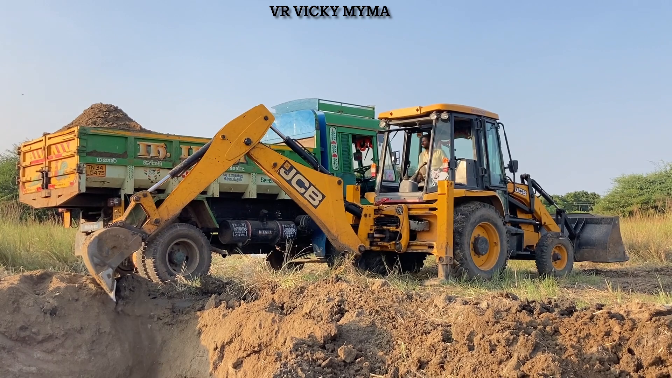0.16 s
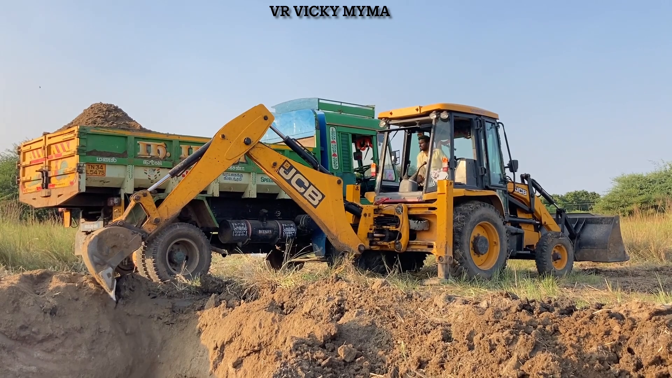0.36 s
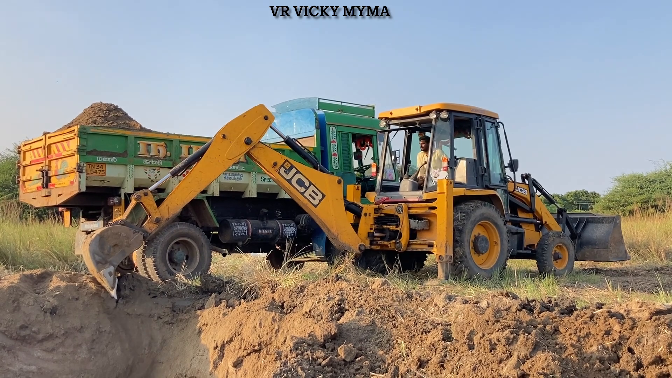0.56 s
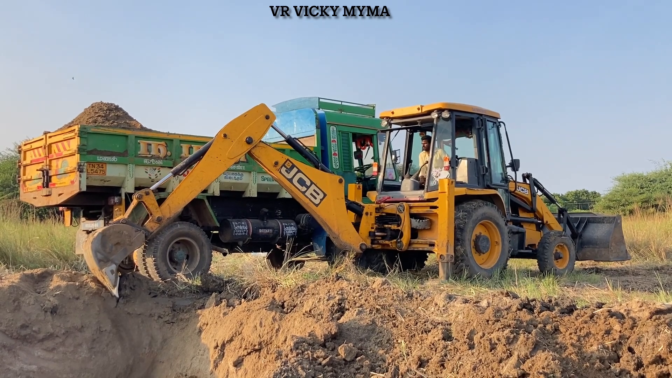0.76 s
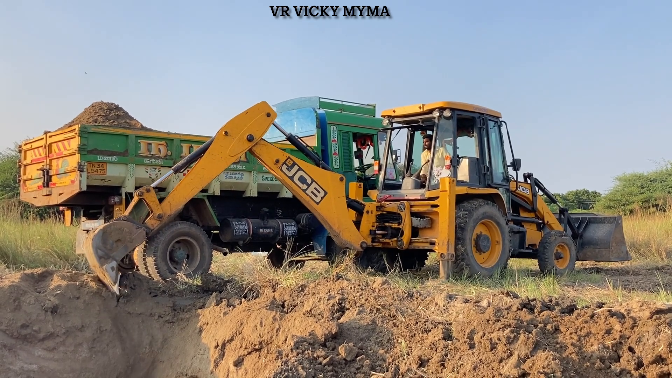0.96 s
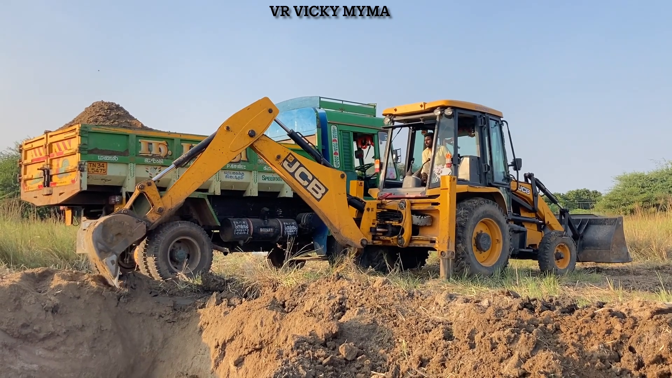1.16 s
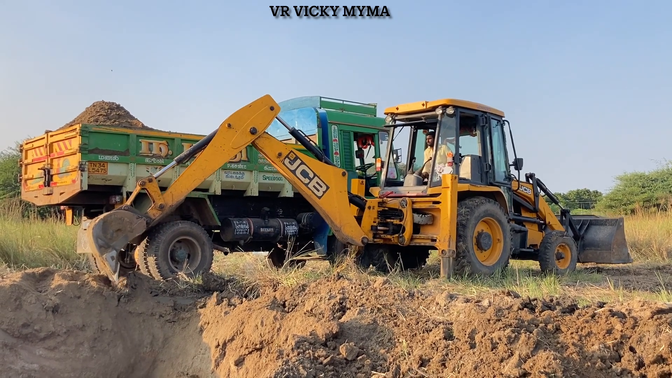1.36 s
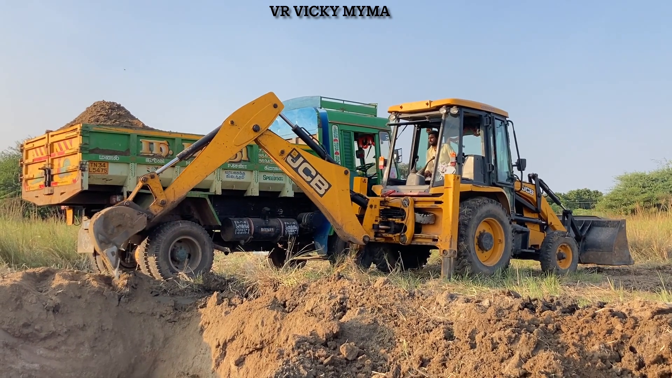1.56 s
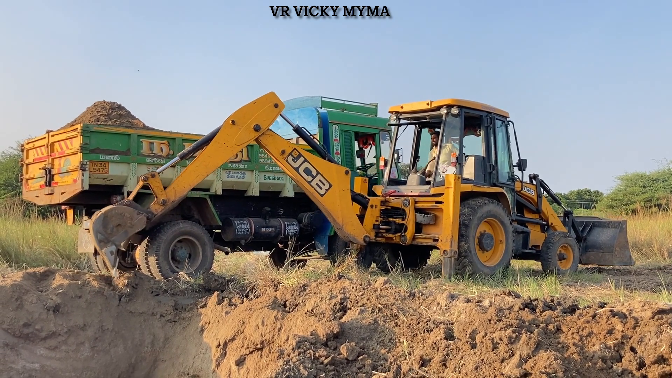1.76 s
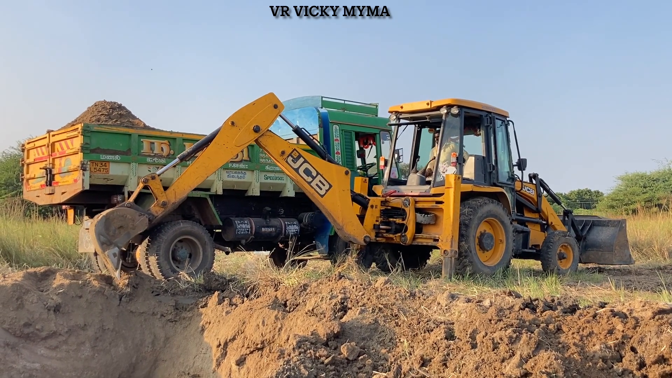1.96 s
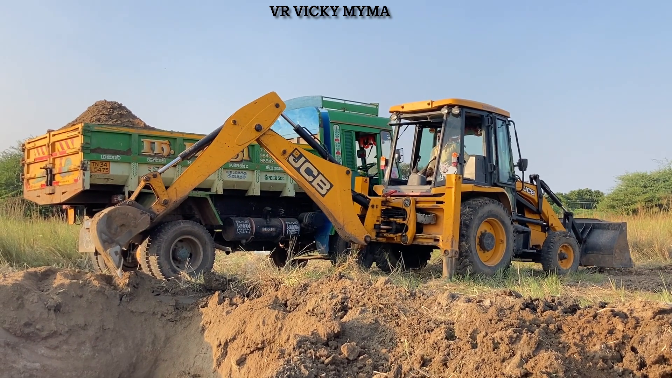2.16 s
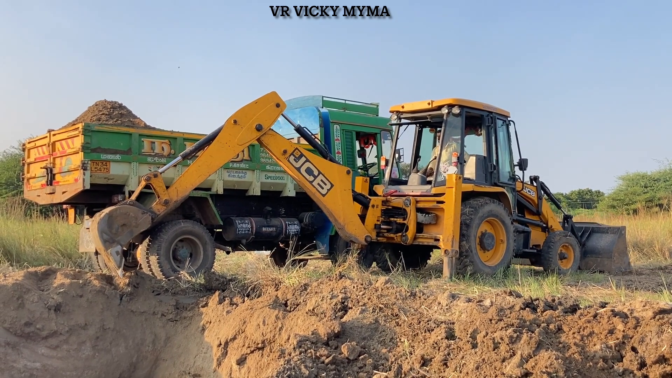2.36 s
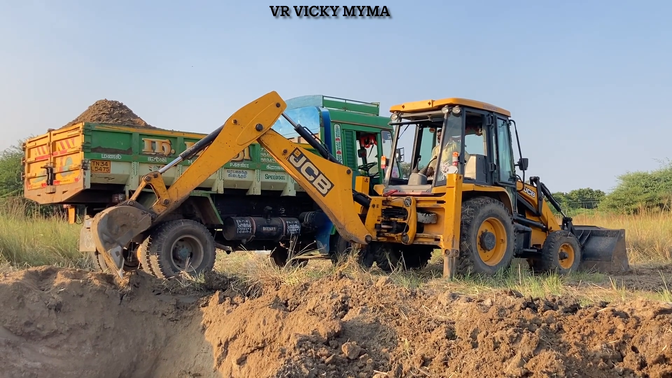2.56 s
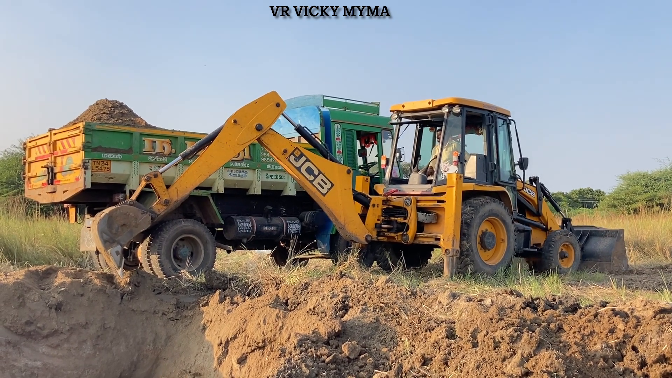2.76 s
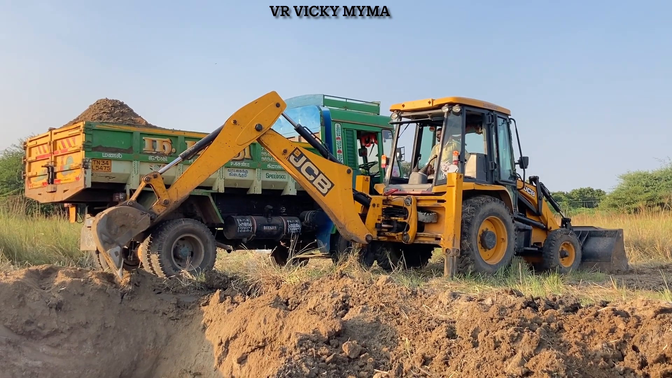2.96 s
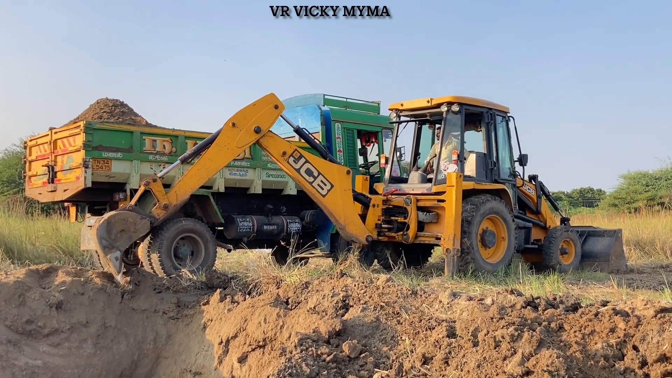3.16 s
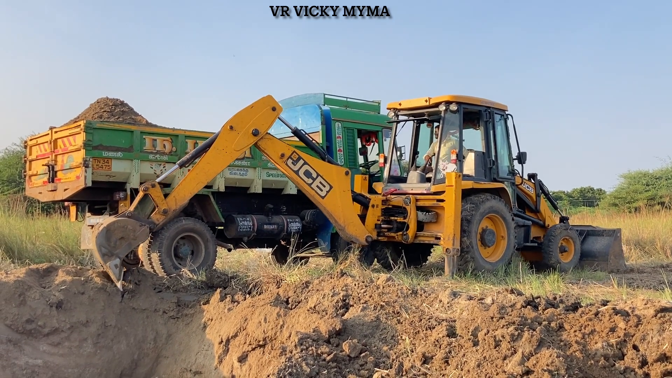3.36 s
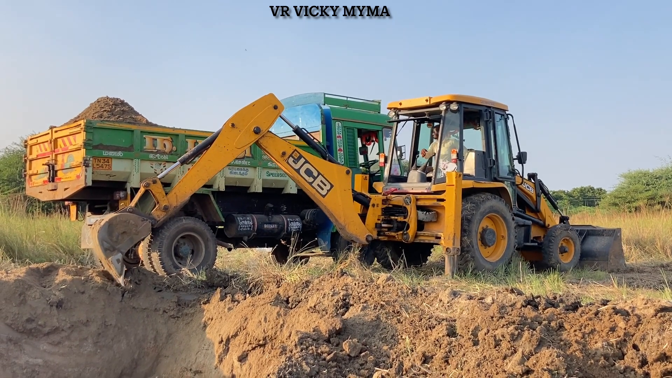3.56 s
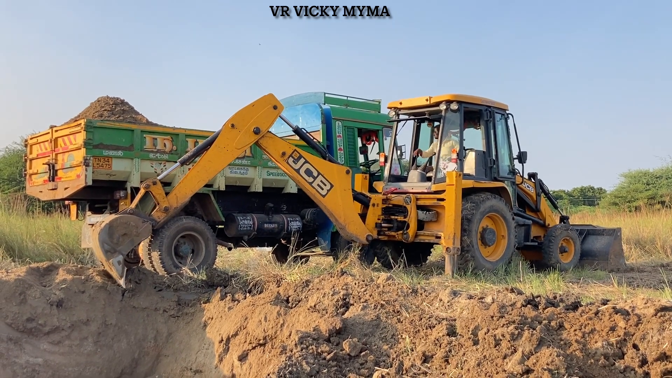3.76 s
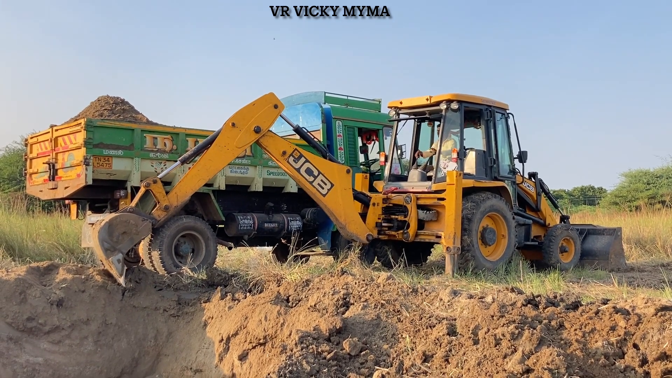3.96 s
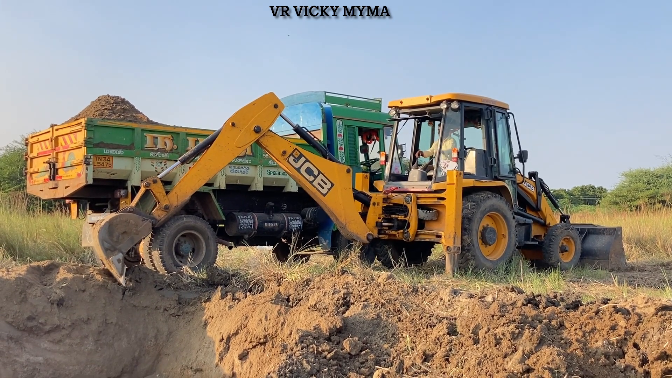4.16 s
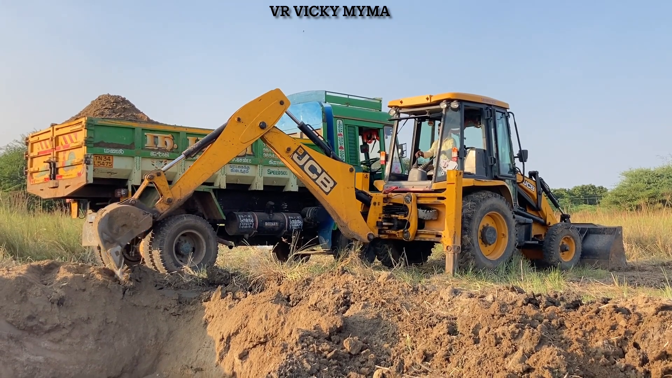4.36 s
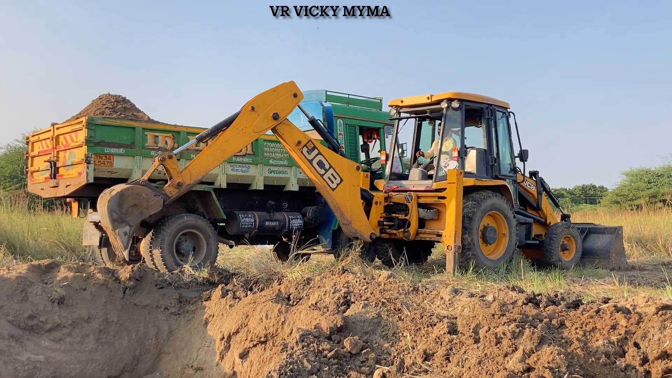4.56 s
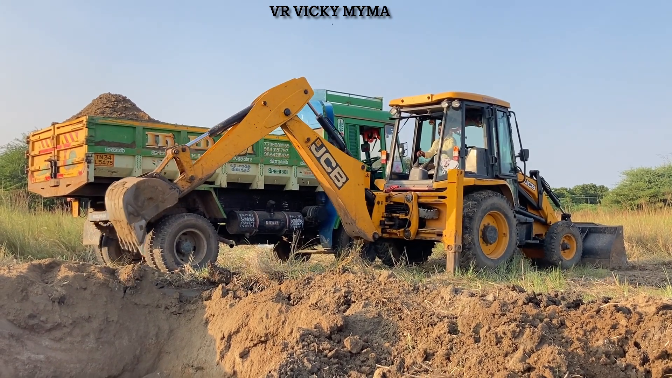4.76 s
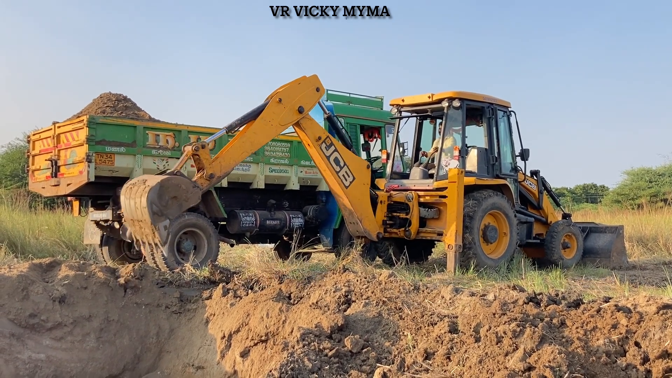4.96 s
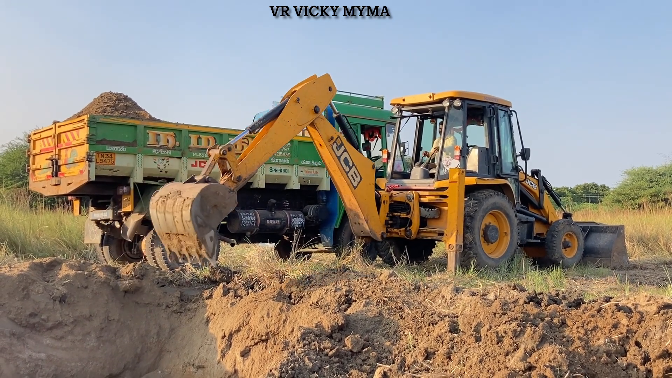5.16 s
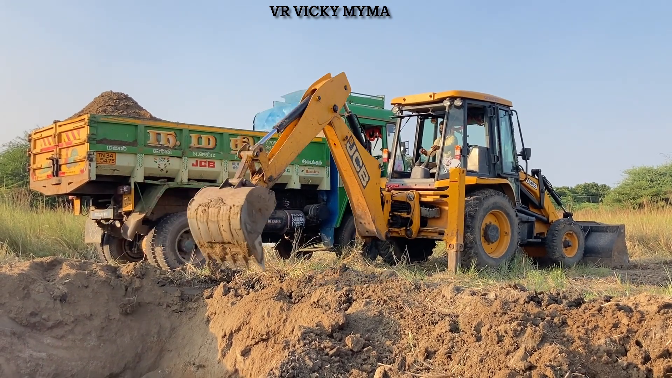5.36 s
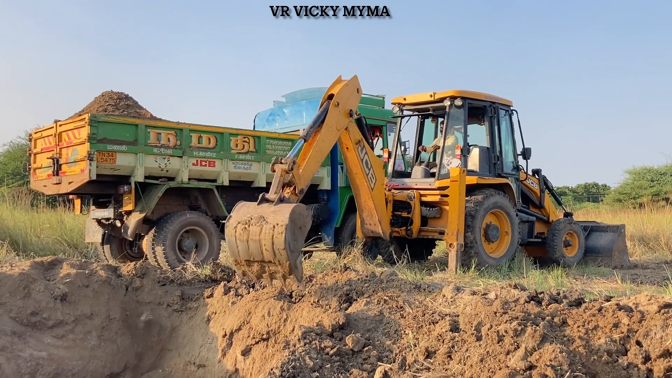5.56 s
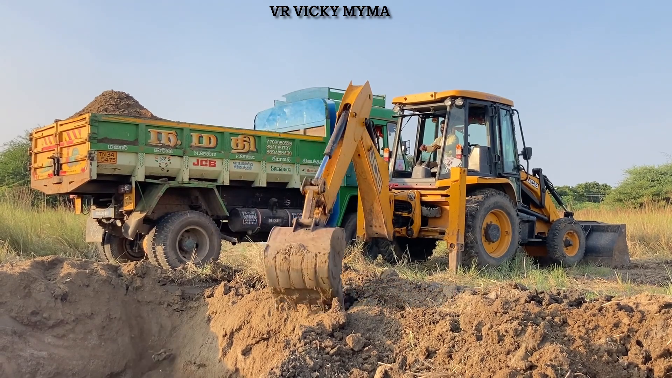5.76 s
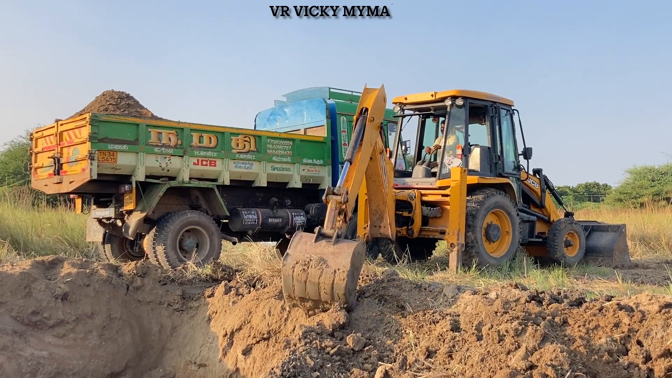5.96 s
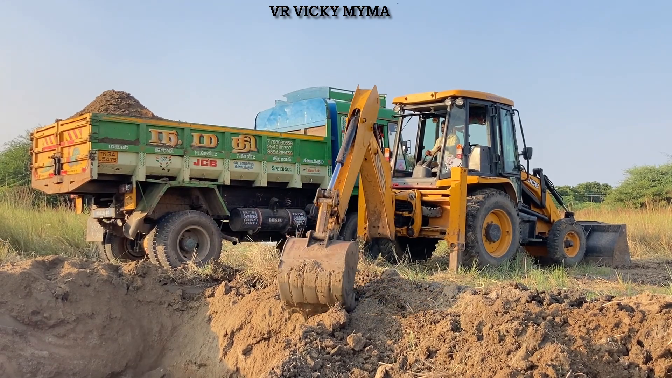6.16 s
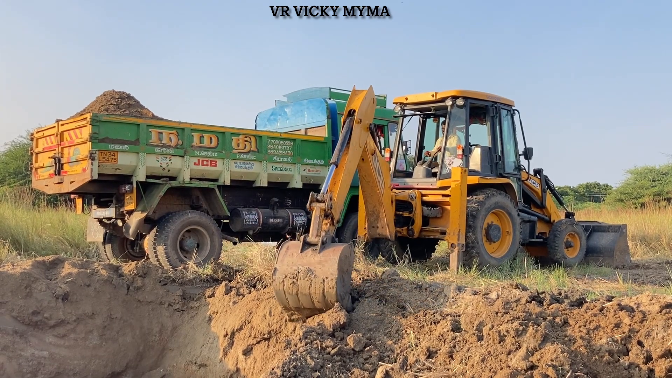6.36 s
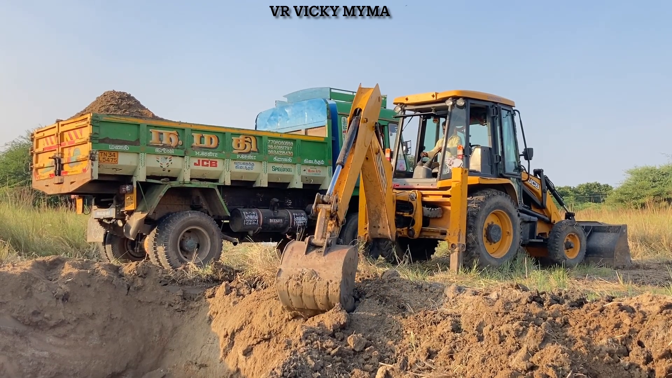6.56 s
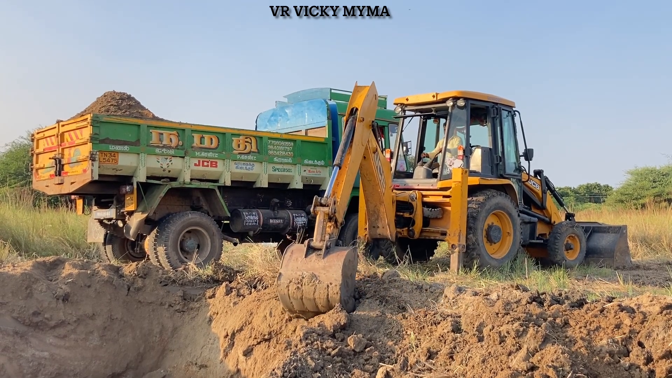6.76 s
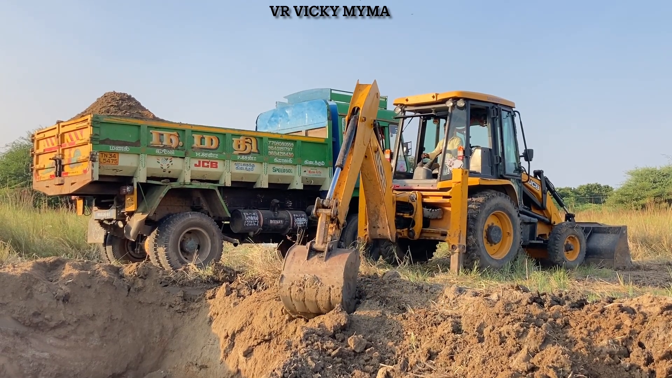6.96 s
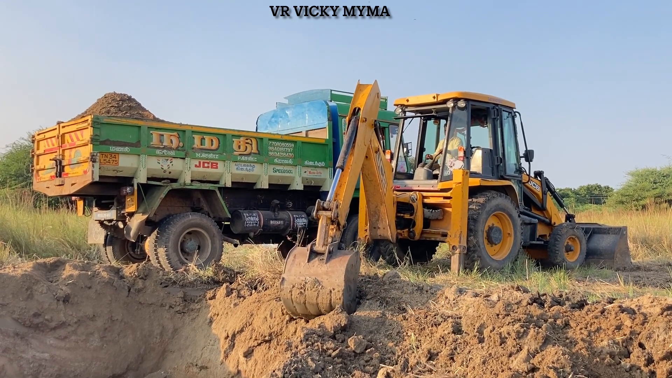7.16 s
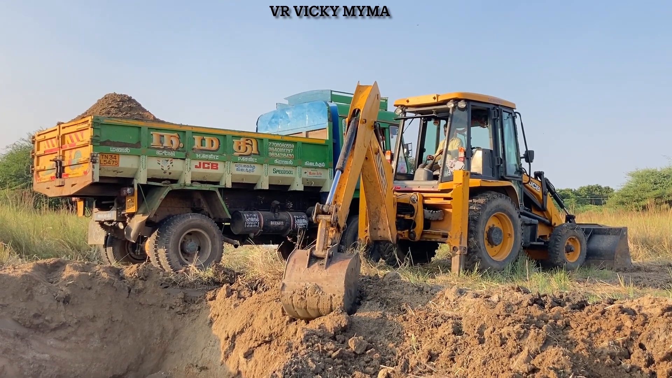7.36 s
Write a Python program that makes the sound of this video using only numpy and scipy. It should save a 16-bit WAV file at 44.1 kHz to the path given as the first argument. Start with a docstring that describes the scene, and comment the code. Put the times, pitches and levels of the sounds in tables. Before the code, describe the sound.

A backhoe loader's diesel engine hums and sags under load while its steel arm knocks, then clanks hard and judders as the swing stops.

```python
"""Backhoe loader lifting and swinging its bucket

A backhoe loader lifts its bucket out of the soil and swings it round, some ten metres off in an open field.
Ram strokes load the four-cylinder diesel: firing tones and pulses through a resonant pipe sag and bark.
Filtered noise makes the block's clatter, the low rumble, the pump's sizzle and the oil hissing through valves.
Slack pins knock in the steel arm, bursts of contacts ringing its modes; it clanks hard as the swing stops
and then judders. Taps, clinks and squeaks come from the bucket, its link and the pins."""
import sys
import numpy as np
from scipy import signal
from scipy.fft import rfft, irfft
from scipy.io import wavfile
from scipy.ndimage import uniform_filter1d

SR = 44100
rng = np.random.default_rng(int(sys.argv[2]) if len(sys.argv) > 2 else 0)


def dump_mix(stems):
    """Bounce the given channels to the path in sys.argv[1] as a 16-bit WAV at rate SR."""
    frames = np.atleast_2d(stems).T  # one column per channel
    limited = np.clip(frames, -1, 1)  # hard clip at full scale
    pcm = np.round(limited * 32767).astype(np.int16)
    wavfile.write(sys.argv[1], SR, pcm)


N = 326781
TIME = np.arange(N) / SR
# The pump's sizzle dies away and cuts back in: start in s, end in s, time to fade in s, time to return in s.
PUMP_REST = (1.84, 2.64, 0.54, 0.034)


def undb(db):
    """Decibels to gain."""
    return 10 ** (np.asarray(db) / 20)


def unit(x):
    """Scale to rms 1."""
    return x / np.sqrt(np.mean(x ** 2))


def noise():
    """White noise."""
    return rng.standard_normal(N)


def walk(rate):
    """Smooth chance with spread 1 and about rate turns a second."""
    k = max(int(SR / rate), 2)
    once = uniform_filter1d(noise(), k, mode="wrap")
    return unit(uniform_filter1d(once, k, mode="wrap"))


def colour(x, points, size=8192):
    """Causal, minimum-phase filter with the given (Hz, dB) response."""
    hz, db = np.transpose(points)
    grid = np.maximum(np.fft.rfftfreq(size, 1 / SR), 1)
    response_db = np.interp(np.log(grid), np.log(hz), db)
    cepstrum = irfft(np.log(undb(response_db)))
    # folding the cepstrum forward makes the filter causal
    cepstrum[1:size // 2] *= 2
    cepstrum[size // 2 + 1:] = 0
    impulse = irfft(np.exp(rfft(cepstrum)))
    return signal.fftconvolve(x, impulse)[:len(x)]


def band(x, hz, width):
    """One resonance, gain 1 at its centre."""
    return signal.lfilter(*signal.iirpeak(hz, hz / width, SR), x)


def resonate(x, table):
    """A body of (Hz, width in Hz, dB) resonances."""
    return sum(undb(db) * band(x, hz, width) for hz, width, db in table)


def add(track, s, sound):
    """Mix a sound in at time s."""
    i = int(s * SR)
    track[i:i + len(sound)] += sound[:N - i]


def gate(start, end, attack_s, release_s):
    """Rises from start, holds at 1 until end, then falls."""
    rise = np.clip((TIME - start) / attack_s, 0, 1)
    fall = np.clip(1 - (TIME - end) / release_s, 0, 1)
    return rise * fall


def bouts(table, steady_db, release_s):
    """Gain of a steady sound with louder bouts on top; their powers add."""
    power = sum((undb(db) * gate(start, end, attack_s, release_s)) ** 2
                for start, end, attack_s, db in table)
    return np.sqrt(undb(steady_db) ** 2 + power)


def hydraulic_load():
    """The hardest-working ram sets the load on the engine."""
    # Each row: start in seconds, end in seconds, time to build in seconds, share of full load.
    strokes = [(0.503, 1.62, 0.42, 0.59), (0.8, 1.672, 0.73, 0.9), (2.85, 3.529, 0.4, 0.98),
               (4.27, 4.599, 0.17, 0.85), (4.598, 5.109, .47, 0.9), (6.359, 7.084, 0.46, 0.96),
               (6.894, 7.41, 0.22, 0.87)]
    unload_s = 0.28
    rams = [share * gate(start, end, build_s, unload_s) for start, end, build_s, share in strokes]
    return np.max(rams, axis=0)


def firing_rate(load):
    """The engine droops under load, sags further as load comes on and overshoots as it lets go."""
    idle_hz, droop_hz, sag_hz, governor_s = 54.33, 3.5, 4.2, 0.22
    keep = np.exp(-1 / (governor_s * SR))
    fuel = signal.lfilter([1 - keep], [1, -keep], load)  # the fuel catches up with the load
    return idle_hz - droop_hz * load - sag_hz * (load - fuel)


def loaded(load, free_db, added_db):
    """Gain of an engine sound from its level running free and the dB added in step with the load."""
    return undb(free_db + added_db * load)


def firings(turns, cylinder_db, scatter_db, jitter_s):
    """One pulse per firing; the four cylinders differ and each firing varies in strength and timing."""
    at = np.flatnonzero(np.diff(np.floor(turns)))
    chance = rng.standard_normal((len(at), 2))
    late = (jitter_s * SR * chance[:, 1]).astype(int)
    strength_db = np.resize(cylinder_db, len(at)) + scatter_db * chance[:, 0]
    pulses = np.zeros(N)
    pulses[np.clip(at + late, 0, N - 1)] = undb(strength_db)
    return pulses


def smear(x):
    """Short reflections round the machine spread each pulse over the cycle and leave its colour alone."""
    # Each row: delay in seconds, share fed back.
    echoes = [(.0031, 0.48), (.0053, 0.55), (.0083, .4)]
    hz, spectrum = np.fft.rfftfreq(N, 1 / SR), rfft(x)
    for delay_s, share in echoes:
        late = np.exp(-2j * np.pi * hz * delay_s)
        spectrum = spectrum * (late - share) / (1 - share * late)  # all-pass echo
    return irfft(spectrum, N)


def exhaust(turns, load):
    """Firing tone, octave and lope of unequal cylinders; pulses with a little gas ring the pipe and bark."""
    # Exhaust pipe resonances. Each row: pitch in Hz, width in Hz, level in dB before the bark's colouring.
    pipe = [(174, 46, -12.5), (223, 24, -11.5), (285, 12, 1.5), (349.6, 34, 5), (536, 60, 0), (761, 13, 8),
            (887, 51, -2.5), (1008, 40, -3)]
    angle = 2 * np.pi * turns
    # the engine coasts after the first stroke and its boom fades by 12 dB
    coast = undb(-12 * gate(start=1.78, end=2.04, attack_s=0.2, release_s=0.26))
    tone = loaded(load, free_db=-34.5, added_db=10) * np.sin(angle - .6) * coast
    octave = loaded(load, free_db=-42, added_db=20) * np.sin(2 * angle - .8)
    lope = loaded(load, free_db=-54, added_db=15) * np.sin(3 * angle / 2)
    pulses = unit(firings(turns, cylinder_db=[.8, -.6, .3, -.9], scatter_db=1.1, jitter_s=.00005))
    gas = unit(np.exp(-(turns % 1) / 0.15) * noise())  # dies away after each firing
    flow = pulses + gas / 4
    bark_colour = [(90, -51.0), (150, 12.5), (1100, -4.5), (2500, -37.0), (8000, -30)]
    bark = unit(colour(resonate(smear(flow), pipe), bark_colour))
    tones = np.sqrt(2) * (tone + octave + lope)  # sine levels are rms
    return tones + bark * loaded(load, free_db=-47, added_db=16.5)


def growl(turns, load):
    """Under load single firing harmonics stand out of the exhaust, each swelling and wavering on its own."""
    orders, mix_db = (7, 11, 15), (0, -4, -11.5)  # multiples of the firing rate, and their relative dB
    tones = np.zeros(N)
    for order, db in zip(orders, mix_db):
        swell = undb(db + 3.5 * walk(24))
        tones += swell * np.sin(2 * np.pi * order * turns + .6 * walk(20))
    return unit(tones) * loaded(load, free_db=-54.5, added_db=20)


def groan(turns):
    """The hydraulic pump drones unsteadily at six times the firing rate against a stalled ram."""
    # Each row: start in seconds, end in seconds, time to build in seconds, level in dB.
    groan_bouts = [(4.85, 5.1, .1, -48), (6.58, 7.03, 0.22, -30), (7.25, 7.41, 0.11, -31)]
    tone = np.sin(6 * 2 * np.pi * turns + .5 * walk(25))
    return unit(tone * undb(2.1 * walk(30))) * bouts(groan_bouts, steady_db=-62, release_s=0.064)


def rumble():
    """A ragged low rumble that swells while the bucket works."""
    # Rumble spectrum. Each row: frequency in Hz, relative level in dB per Hz.
    low_spectrum = [(20, -50), (35, -17), (50, -10), (65, -2.5), (105, -7.5), (135, -11.5), (220, -16),
                    (400, -31), (900, -78)]
    # Each row: start in seconds, end in seconds, time to build in seconds, level in dB.
    swells = [(.62, .85, 0.086, -32.5), (1.6, 1.82, 0.094, -24.5), (2.3, 3.3, 0.086, -33),
              (5.5, 6.15, 0.27, -32.5)]
    return unit(colour(noise(), low_spectrum)) * bouts(swells, steady_db=-35.5, release_s=0.4)


def slap(blows, decay_s, top_hz, count):
    """Each cylinder thumps the block in its own way, the same shape on every cycle."""
    t, out = TIME[:SR // 16], np.zeros(N)
    shapes = rng.standard_normal((count, len(t))) * np.exp(-t / decay_s)
    for k, i in enumerate(np.flatnonzero(blows)):
        add(out, i / SR, blows[i] * shapes[k % count])
    return signal.sosfilt(signal.butter(2, top_hz, fs=SR, output="sos"), unit(out))


def block(turns, load):
    """Combustion knock, strongest once a shaft turn, with valve gear and fan shakes the block and covers."""
    # Block spectrum. Each row: frequency in Hz, relative level in dB per Hz.
    block_spectrum = [(100, -36.5), (150, -1.5), (215, 2.5), (285, -5), (345, 8.5), (410, -8), (495, -1.5),
                      (610, -17), (1000, -11), (1800, -16), (2900, -35), (3600, -31), (5000, -32),
                      (12000, -31.5), (16000, -31.5)]
    # Engine cover resonances. Each row: pitch in Hz, width in Hz, relative level in dB.
    panels = [(347.6, 40, 7), (730, 33, 7.5), (878.4, 19, -4)]
    blows = firings(turns, cylinder_db=[2.5, -8.5, 2.5, -2.5], scatter_db=3.0, jitter_s=.0002)
    knock = slap(blows, decay_s=0.015, top_hz=1790, count=4)
    gear = unit(noise() * undb(1.74 * walk(61)))
    drive = unit(knock + 1.5 * gear)
    covers = unit(resonate(np.roll(drive, SR // 500), panels))  # 2 ms after the block
    body = unit(colour(drive, block_spectrum)) + undb(-9.0) * covers
    return unit(body) * loaded(load, free_db=-32, added_db=1.5)


def rattle(load):
    """A loose cover chatters in irregular fits as the engine labours."""
    # Loose cover resonances. Each row: pitch in Hz, width in Hz, relative level in dB.
    cover = [(877, 49, -2), (979, 38, 3), (1028, 78, 5)]
    chatter = noise() * undb(3.5 * walk(45))
    return unit(band(resonate(chatter, cover), 984, 420)) * loaded(load, free_db=-57, added_db=16.5)


def valves():
    """A valve opens and oil rushes through, hissing with a slight flutter."""
    # Hiss spectrum. Each row: frequency in Hz, relative level in dB per Hz.
    hiss_spectrum = [(1000, -15), (2500, -1), (5000, 7), (7000, 10), (9000, 2), (11400, 10), (16000, -4)]
    # Each row: start in seconds, end in seconds, time to open in seconds, level in dB.
    openings = [(1.7, 2.05, 0.54, -48), (2.7, 3.5, 0.13, -50), (3.25, 3.31, 0.02, -42),
                (4.92, 5.02, 0.063, -45), (5.15, 5.88, 0.59, -46.5), (6.5, 7.02, 0.4, -36),
                (7.2, 7.41, 0.029, -45)]
    hiss = unit(colour(noise() * undb(2.2 * walk(36)), hiss_spectrum))
    return hiss * bouts(openings, steady_db=-56.5, release_s=0.17)


def pump():
    """A fine sizzle of oil in one broad resonance; it stops while the levers rest."""
    working = 1 - gate(*PUMP_REST)
    sizzle = unit(band(band(noise(), 3500, 2900), 3500, 2900))
    return sizzle * working * undb(-51.5 + 2.0 * walk(51))


def steel(force, ring_db, spread_db):
    """The arm's answer to a force: a dense clash plus its modes, whose mix depends on the place struck."""
    # Contact spectrum. Each row: frequency in Hz, relative level in dB.
    contact_spectrum = [(80, -16.5), (170, 8), (600, 3), (1400, 4), (2400, -2), (3000, -9.5), (3700, -7.5),
                        (4700, -20.5), (5400, -11.5), (7000, -18.5), (11000, -22.5), (16000, -38)]
    # Modes of arm and bucket. Each row: mean pitch in Hz, mean relative level in dB, 60 dB decay in seconds.
    modes = [(164, -4, 0.67), (182, -7, 0.4), (226.6, 2, 0.27), (345, -9, 0.26), (448, -3.5, 0.59),
             (523.5, -2, 0.41), (696, 0.5, 0.47), (788, 6, 0.13), (957, 0, 0.14), (1031, 5, 0.13),
             (1413, -4.5, 0.25), (1454, 4, 0.094), (1543, -9, 0.12), (1794, -2.5, 0.11), (1912, -1.5, 0.13),
             (2296, -3, 0.089), (2309, -6.5, 0.1), (2445, -9, 0.13), (2790, -10.5, 0.11), (3460, -9.5, .17),
             (3580, -11, .13), (4100, -15.5, 0.18)]
    t, ring = TIME[:SR // 4], 0
    place = rng.standard_normal((len(modes), 2))
    for (hz, db, t60), (level_chance, pitch_chance) in zip(modes, place):
        wave = np.sin(2 * np.pi * hz * (1 + 0.0038 * pitch_chance) * t)
        ring = ring + undb(db + spread_db * level_chance) * wave * np.exp(-np.log(1000) * t / t60)
    ringing = unit(signal.fftconvolve(force, ring)[:len(force)])
    return unit(colour(force, contact_spectrum)) + undb(ring_db) * ringing


def judder():
    """Dense small slips in the joints keep the arm ringing, louder as it moves or shakes."""
    # Each row: start in seconds, end in seconds, time to build in seconds, level in dB.
    shakes = [(2.75, 3.5, 0.4, -43), (4.95, 5.1, 0.081, -41), (6.04, 6.1, 0.16, -29), (6.2, 6.36, .08, -45),
              (6.48, 7.02, 0.26, -36.5), (7.19, 7.41, 0.13, -29)]
    slips = colour(noise() * undb(1.6 * walk(180.0)), [(200, -23.0), (2300, 3.0), (3500, -4.5)])
    ringing = unit(steel(slips, ring_db=1, spread_db=2.5))
    return ringing * bouts(shakes, steady_db=-48.5, release_s=0.19)


def pings(table, decay_s, width, grain):
    """Brief contacts, a blow and some rattle, each with one broad resonance (width is a share of its Hz)."""
    out, t = np.zeros(N), TIME[:SR // 10]
    for s, db, hz in table:
        ping = (t == 0) + grain * rng.standard_normal(len(t)) * np.exp(-t / decay_s)
        ping = band(band(ping, hz, width * hz), hz, width * hz)
        add(out, s, undb(db) * ping / np.abs(ping).max())
    return out


def knocks():
    """Every knock is a burst of separate hard contacts that starts at once and dies as the joint seats."""
    # Knocks of pins and bucket. Each row: start in seconds, level of the loudest 10 ms in dB,
    # time the contact rattles in seconds, treble tilt in dB per octave.
    knock_table = [(0.708, -30, 0.032, 4), (0.788, -31, 0.018, 0.5), (1.445, -32.5, 0.027, 1),
                   (1.591, -29, 0.039, -0.5), (1.938, -28.5, 0.033, 0), (1.974, -29, 0.049, -2),
                   (3.044, -34, 0.0044, 5), (3.173, -31, 0.0081, 1.5), (4.21, -24.5, 0.028, -2),
                   (4.24, -28.5, 0.037, -2.5), (4.435, -24, 0.022, -1.5), (4.975, -27, 0.018, -1.5),
                   (5.034, -25, 0.014, -2), (5.062, -27.5, 0.024, -1), (5.086, -27, 0.02, -1.5),
                   (5.104, -23, 0.01, -3), (5.222, -26.5, 0.0087, 3), (5.230, -17, 0.0091, -2),
                   (5.244, -22, 0.007, -4), (5.253, -20, 0.019, 0.5), (5.858, -26, 0.028, -4),
                   (5.947, -24, 0.06, 1.5), (5.975, -12, 0.018, -0.1), (5.981, -13.5, 0.011, -4),
                   (5.999, -19, 0.012, 0.5), (6.011, -15, 0.012, 0.5), (6.028, -12.5, 0.013, -2),
                   (6.045, -20, 0.027, 3), (6.078, -21.5, 0.024, -0.5), (6.094, -26, 0.014, 0.5),
                   (6.217, -14.5, 0.017, 0.5), (6.238, -25.5, 0.014, 6.5), (6.276, -21, 0.013, -1.5),
                   (6.31, -27, 0.13, -2.5), (6.492, -30, 0.029, 0), (6.714, -30.5, 0.016, -0.5)]
    contacts_per_s, build_s = 1900, 0.00069
    out, t = np.zeros(N), TIME[:SR // 2]
    for s, db, rattle_s, tilt_db in knock_table:
        chance = rng.standard_normal((2, len(t)))
        struck = rng.random(len(t)) < contacts_per_s / SR
        contacts = struck * np.sign(chance[0]) * undb(2.5 * chance[1])
        force = contacts * np.exp(-t / rattle_s) * (1 - np.exp(-t / build_s))
        clash = steel(force, ring_db=-2, spread_db=2)
        # the two points lie four octaves apart
        blow = colour(clash, [(250, -2 * tilt_db), (4000, 2 * tilt_db)], size=512)
        loudest = np.sqrt(uniform_filter1d(blow ** 2, SR // 100).max())
        add(out, s, blow / loudest * undb(db))
    return out


def clinks(table, modes):
    """A small steel part is struck and rings with its few high modes, in chance phases."""
    out, t = np.zeros(N), TIME[:SR // 4]
    for s, peak_db in table:
        ring = 0
        for hz, db, t60 in modes:
            wave = np.sin(2 * np.pi * (hz * t + rng.random()))
            ring = ring + undb(db) * wave * np.exp(-np.log(1000) * t / t60)
        ring = ring * (1 - np.exp(-t / 0.0012))  # soft onset
        add(out, s, undb(peak_db) * ring / np.abs(ring).max())
    return out


def squeaks():
    """Dry pins squeak as they turn: stick and slip sing briefly at one wavering pitch."""
    # Each row: start in seconds, level in dB about which the peak flutters, mean pitch in Hz, length in s.
    squeak_table = [(.786, -33, 1484, 0.025), (2.618, -32, 1970, 0.02), (2.796, -31, 1960, 0.027),
                    (4.22, -29, 827, 0.068), (5.230, -23, 2320, 0.024), (5.232, -31, 6142, 0.02),
                    (5.236, -34, 7100, .016), (6.79, -42, 2300, 0.043), (7, -33, 5250, 0.028),
                    (7.24, -36.5, 2300, 0.23)]
    out, drifts = np.zeros(N), (walk(350), walk(200))
    for s, db, hz, length_s in squeak_table:
        t = TIME[:int(length_s * SR)]
        waver, flutter = (np.roll(drift, -int(s * SR))[:len(t)] for drift in drifts)
        cycles = np.cumsum(hz * (1 + .02 * waver)) / SR
        swell = np.sin(np.pi * (t / t[-1]) ** 1.8)
        add(out, s, undb(db + 2.3 * flutter) * swell * np.sin(2 * np.pi * cycles))
    return out


def arm():
    """Everything that the boom, its pins and the bucket give off."""
    # Hollow taps and dull thuds of the bucket. Each row: start in seconds, peak in dB, pitch in Hz.
    tap_table = [(.69, -23, 83), (.797, -18.5, 90), (.822, -20, 68), (.874, -21.5, 900), (1.095, -24, 85),
                 (1.18, -24, 940), (1.263, -19.5, 940), (1.612, -19, 85), (3.462, -19, 970),
                 (3.484, -23.5, 960), (7.004, -18, 930), (7.085, -16.5, 1000)]
    # Sharp ticks of grit. Each row: start in seconds, peak in dB, pitch in Hz.
    tick_table = [(1.69, -24.5, 9800), (4.299, -28, 7400), (6.019, -18.5, 10910), (6.034, -18.5, 8300),
                  (6.222, -35, 10930)]
    # A pin drops in its bush and clinks. Each row: start in seconds, peak in dB.
    pin_drops = [(.709, -21), (.719, -21.5), (3.044, -48), (5.984, -17), (6.022, -20)]
    # Modes of the pin. Each row: pitch in Hz, relative level in dB, 60 dB decay in seconds.
    pin_modes = [(1797, 3.5, 0.16), (2386, 0, 0.11), (2480, 2, 0.058), (3295, -5, 0.12), (3760, -5, 0.11),
                 (5280, -6, 0.061)]
    # The bucket's link clanks against its stop. Each row: start in seconds, peak in dB.
    link_clanks = [(5.222, -23), (5.231, -25), (5.245, -16), (5.259, -20), (6.219, -25)]
    # Modes of the link. Each row: pitch in Hz, relative level in dB, 60 dB decay in seconds.
    link_modes = [(1553, 0, 0.11), (1690, -4, .13), (2120, -16, 0.12), (2320, 0, 0.069), (2670, -6, 0.13),
                  (3300, -1.5, 0.12), (4016, -17, .12), (6142, -14, .06)]
    taps = pings(tap_table, decay_s=.012, width=.24, grain=.045)
    grit = pings(tick_table, decay_s=0.0082, width=1.0, grain=1)
    small_parts = clinks(pin_drops, pin_modes) + clinks(link_clanks, link_modes)
    return judder() + taps + knocks() + small_parts + squeaks() + grit


def field(source, pan_db, side_db):
    """Direct sound plus scatter off soil and machine, 4 ms later, with random parts drawn afresh."""
    # Sound from the sides. Each row: frequency in Hz, level in dB before the side level is added.
    scatter = [(50, -14), (300, -23.5), (600, -19), (1200, -17.5), (1800, -9.5), (2350, -10.5), (3000, -9),
               (4000, -11.5), (7000, -46)]
    direct = source()
    late = np.pad(source(), (SR // 250, 0))[:N]
    side = undb(side_db) * colour(late, scatter)
    # the scatter reaches the two channels in opposite sign; positive pan favours the left
    return np.array([(direct + side) * undb(pan_db / 2), (direct - side) * undb(-pan_db / 2)])


def scene():
    """Engine slightly on the right, the arm to the left of it."""
    load = hydraulic_load()
    hunting = 0.35 * walk(9.05)  # Hz, the speed wavers about the governor's setting
    turns = np.cumsum(firing_rate(load) + hunting) / SR  # counted in firings
    eased = undb(-2 * gate(*PUMP_REST))  # the block clatters less while the pump rests

    def low_sounds():
        """The exhaust with its growl, the groan of the pump and the rumble."""
        return exhaust(turns, load) + growl(turns, load) + groan(turns) + rumble()

    def machine_sounds():
        """The block and loose cover, with the oil in valves and pump."""
        return block(turns, load) * eased + rattle(load) + valves() + pump()

    low = field(low_sounds, pan_db=-0.5, side_db=1.5)
    machine = field(machine_sounds, pan_db=-0.24, side_db=3.0)
    return low + machine + field(arm, pan_db=1.5, side_db=4.0)


def record(dry):
    """Microphone ports shift left against right; the recorder rounds the loudest peaks and cuts the top."""
    # Phase between the two ports. Each row: frequency in Hz, lead of the left in radians (negative lags).
    ports = [(2400, 0), (3100, 1.0), (3700, .6), (4300, .7), (5400, 2.1), (6200, 1.3), (7050, 0),
             (16000, -13.1)]
    lead = np.interp(np.fft.rfftfreq(N, 1 / SR), *np.transpose(ports))
    left = irfft(rfft(dry[0]) * np.exp(1j * lead), N)
    rounded = .8 * np.tanh(np.array([left, dry[1]]) / .8)
    top_hz = 15900
    return signal.sosfilt(signal.ellip(10, .2, 80, top_hz, fs=SR, output="sos"), rounded)


dry = scene()
out = record(dry)
dump_mix(out)
```